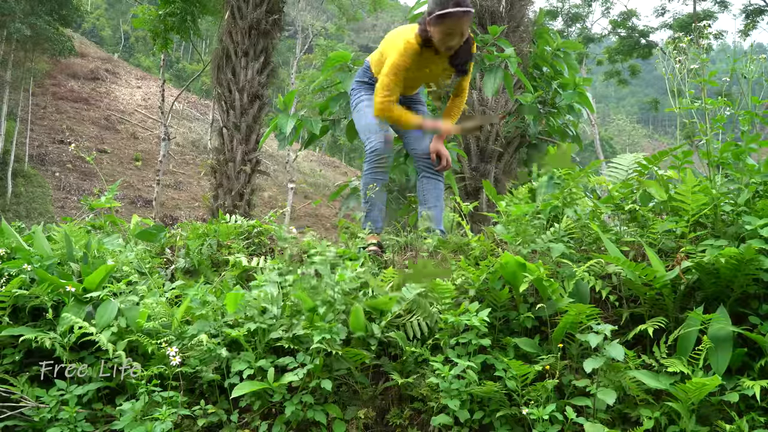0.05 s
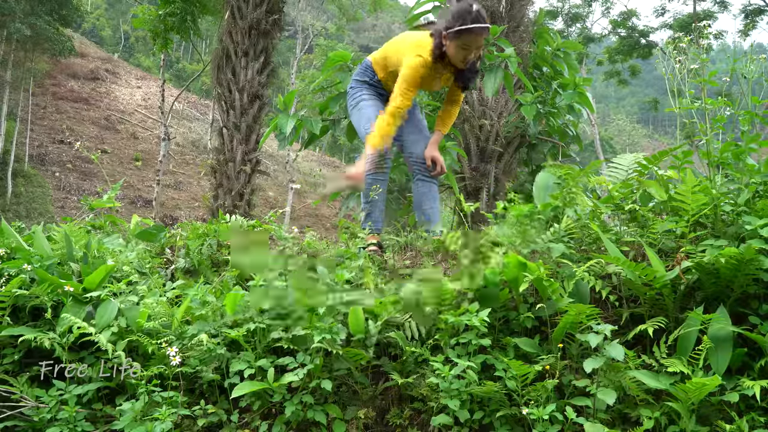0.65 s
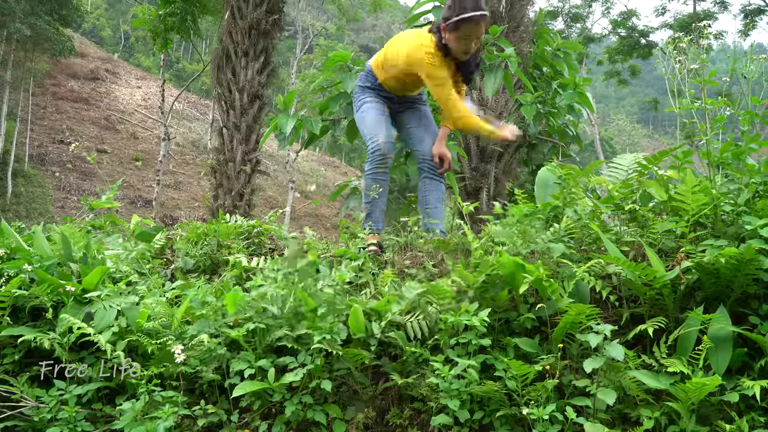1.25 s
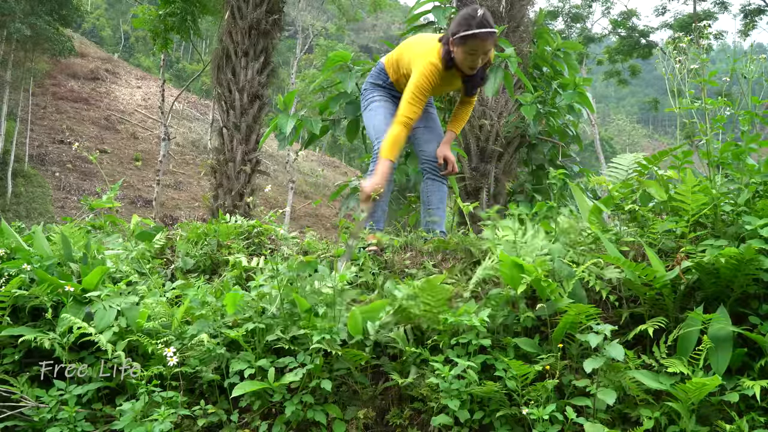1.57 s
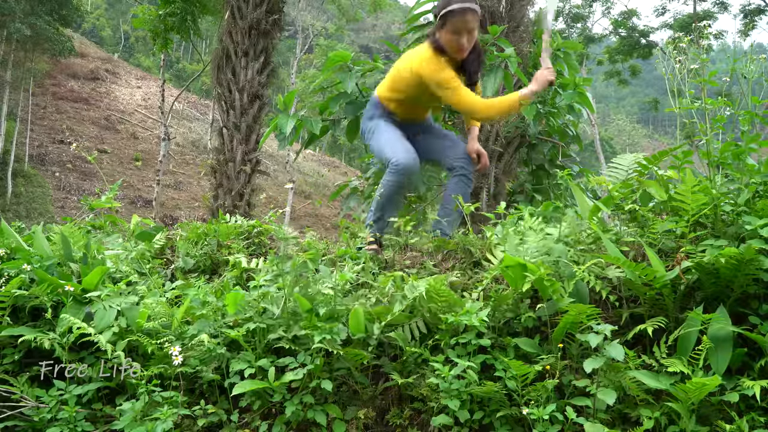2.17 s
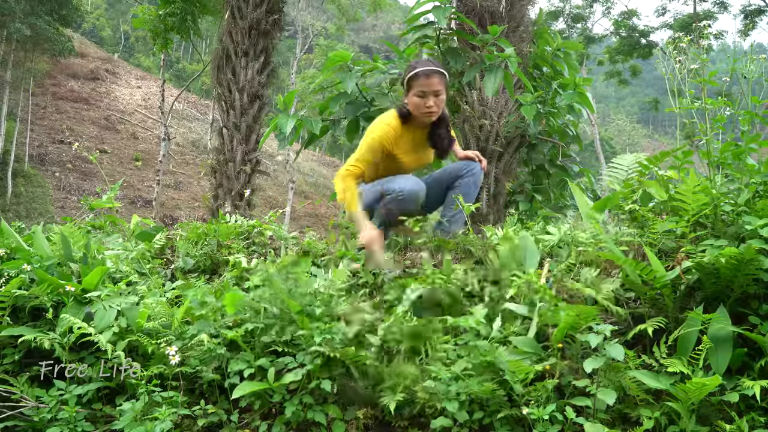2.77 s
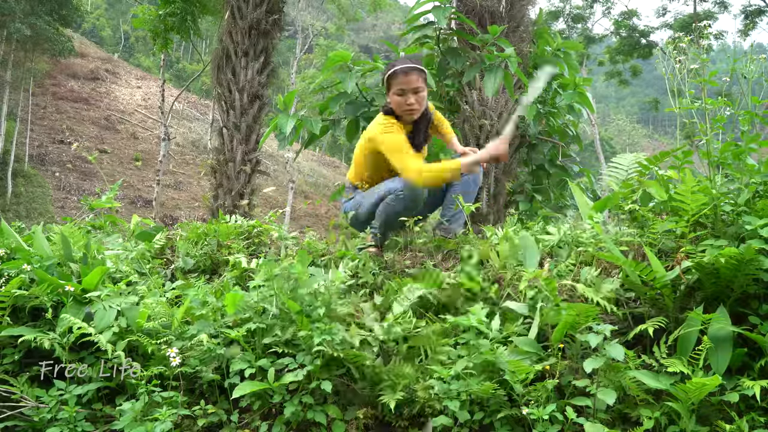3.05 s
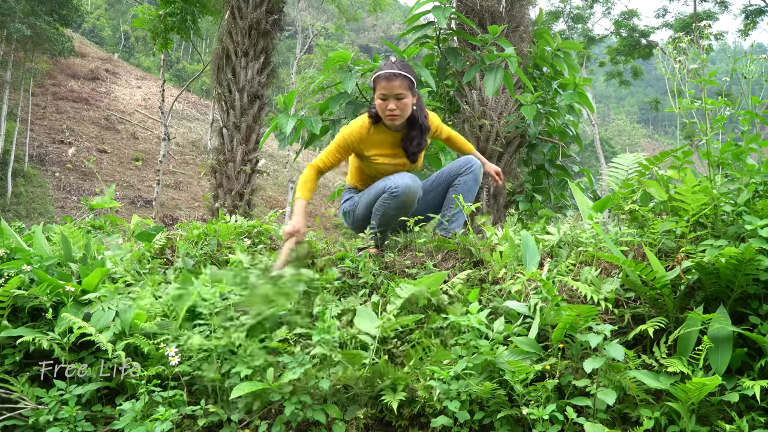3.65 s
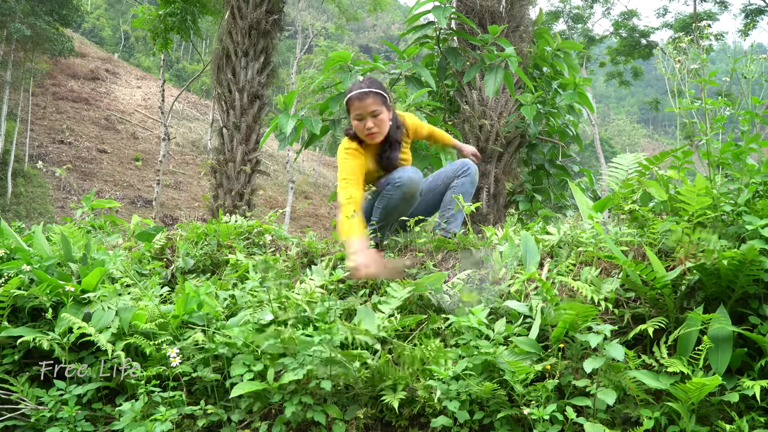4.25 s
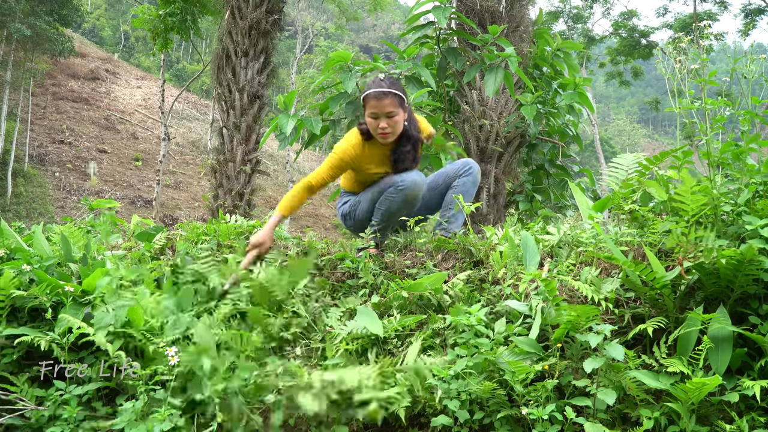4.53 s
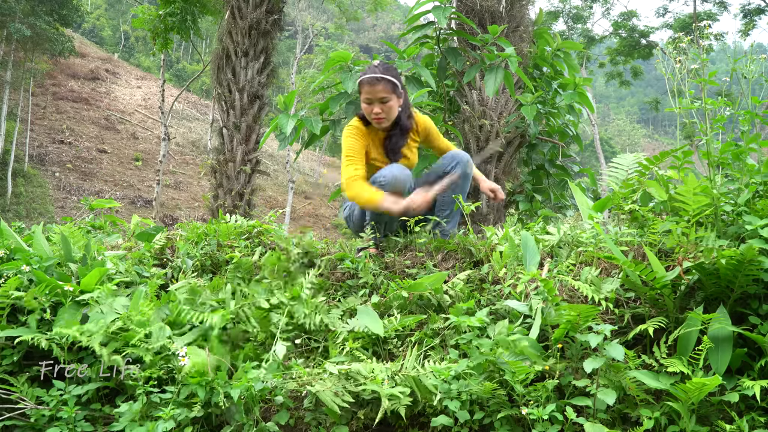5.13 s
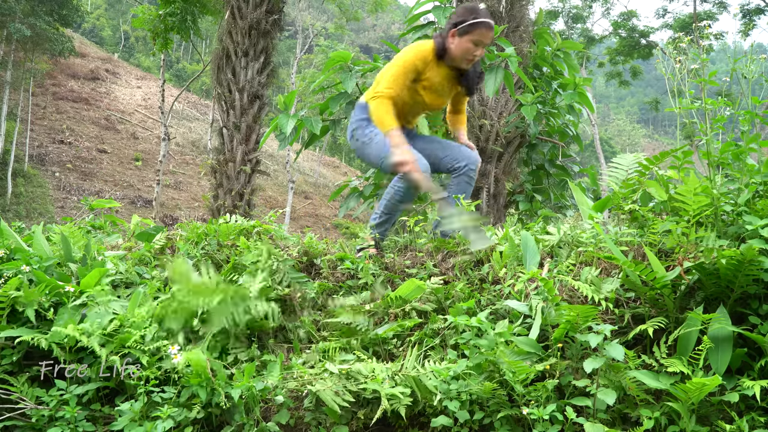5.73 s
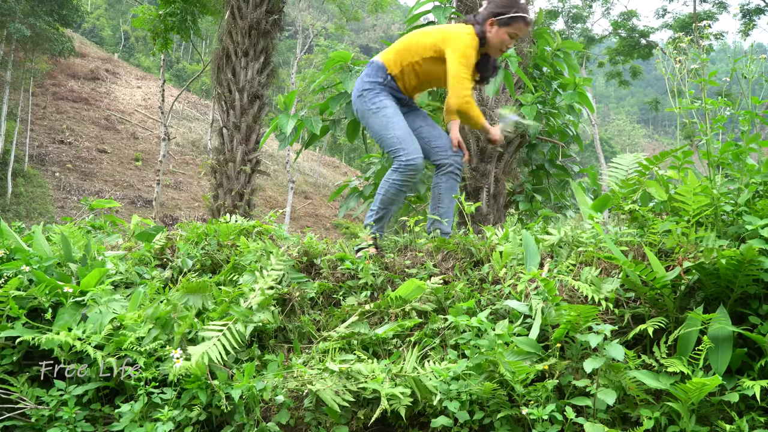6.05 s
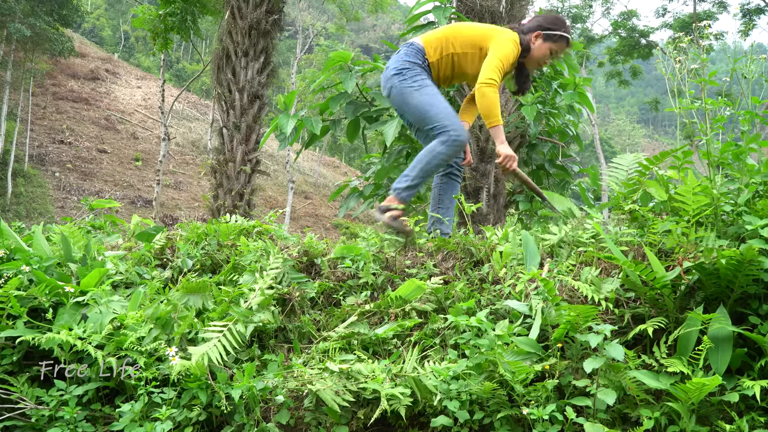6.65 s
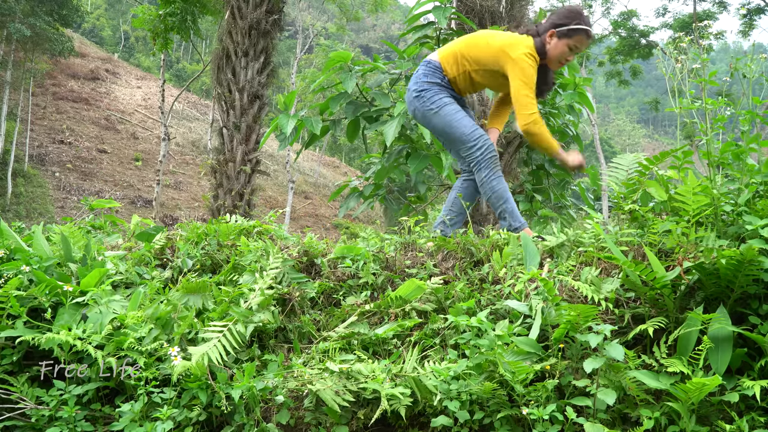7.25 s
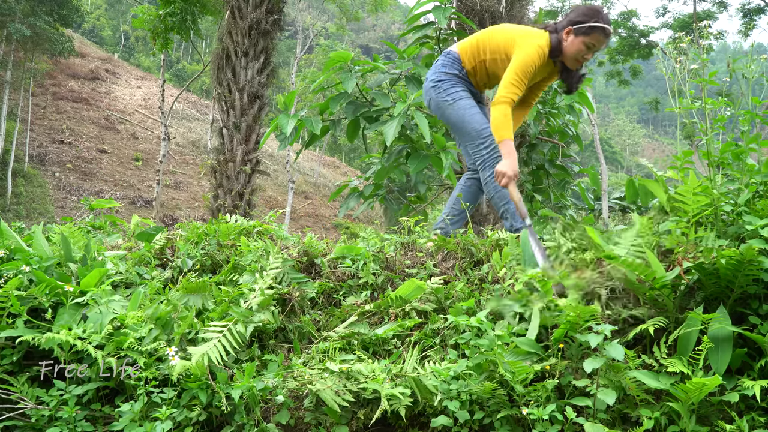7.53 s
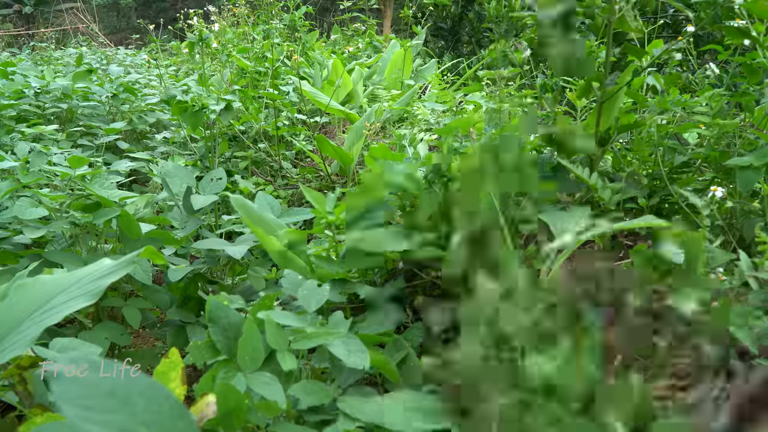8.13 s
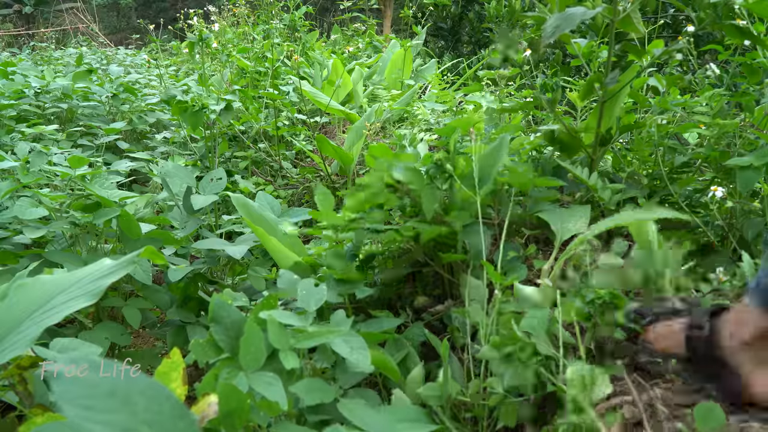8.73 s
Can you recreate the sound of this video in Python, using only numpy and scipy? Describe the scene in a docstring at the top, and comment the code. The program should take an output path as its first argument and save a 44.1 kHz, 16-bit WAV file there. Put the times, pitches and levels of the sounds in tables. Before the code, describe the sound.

Repeated swishing chops cut weeds and thud into soil, stems cracking and leaves pattering down, while insects chirr softly outdoors.

```python
"""A hillside garden, where a short-handled blade chops again and again through weeds into the soil. Each stroke
is a mass of tiny fractures: stems tear, the steel rings and the damped earth thuds. Thick stems snap, wood
knocks once and dry stalks creak by stick-slip friction; cut leaves and twigs patter down. Behind the work,
insects chirr, a cicada whistles once, and far birds whistle and hoot over a soft hush of air."""
import sys
import numpy as np
from scipy import signal
from scipy.fft import rfft, irfft, next_fast_len
from scipy.io import wavfile

SR = 44100
rng = np.random.default_rng(int(sys.argv[2]) if len(sys.argv) > 2 else 0)


def pcm_store(signal):
    """Save signal as 16-bit PCM."""
    levels = np.round(np.clip(np.atleast_2d(signal), -1, 1) * 32767)
    wavfile.write(sys.argv[1], SR, levels.astype(np.int16).T)


N = 387638
TIME = np.arange(N) / SR

# strokes of the blade: start_s, rise_s, in_weeds_s, level_db, t60_s, treble_db, bass_db, soil_db
CHOPS = [(0.552, 0.022, 0.047, -16, 0.28, 3, -2, -30.5), (0.634, .002, .02, -20, 0.31, -4.5, -6, -45),
         (1.476, .011, 0.099, -15.5, 0.37, 1, -2, -28), (2.507, 0.0063, 0.1, -11.5, 0.094, -2.5, -3.5, -24),
         (3.417, 0.01, 0.094, -11.5, 0.23, -6.5, -3.5, -32), (4.359, 0.015, 0.12, -12, 0.2, -5, -3, -33),
         (5.284, 0.018, 0.091, -12, 0.16, -2, -4.5, -31),
         (6.514, 0.0074, 0.018, -17, 0.036, -24, -0.5, -38), (7.409, 0.017, 0.056, -19, 0.51, 2, -2, -32),
         (8.139, .002, 0.052, -10.5, .26, -13, -7, -29)]
# blade or legs brushing through plants: start_s, swell_s, level_db, t60_s
BRUSHES = [(0.063, 0.011, -30, 0.23), (2.492, 0.015, -21, 0.053), (2.88, 0.031, -23, .13),
           (6.468, 0.059, -24.5, 0.23), (8.101, 0.013, -19.5, 0.21), (8.324, 0.078, -27, 0.12),
           (8.459, 0.0058, -26.5, 0.24), (8.657, 0.013, -30.5, 1.1)]
# spectrum of tearing stems: frequency_hz, level_db
TEAR_SPECTRUM = [(18, -48), (30, -12), (309, 1.5), (471, -2), (662, 3), (883, -4), (1570, -0.5), (1790, -3),
                 (2660, -2.5), (3740, -2), (7200, -9), (8870, -9), (10900, -15), (12500, -13),
                 (15800, -19.5)]
# damped modes of the steel: pitch_hz, level_db, t60_s
BLADE_MODES = [(322, -24.5, 0.058), (652, -33.5, 0.3), (950, -21.5, 0.014), (1170, -24, 0.017),
               (3840, -21.5, 0.0046)]
# blows on roots and firm clods: start_s, level_db, pitch_hz, t60_s
CLODS = [(0.635, -20, 686, 0.038), (2.517, -14.5, 335, 0.16), (2.924, -30, 251, .035),
         (3.428, -27, 257, 0.088), (4.384, -22.5, 184, 0.12), (6.520, -15, 556, 0.049),
         (7.428, -25.5, 270, .11), (8.204, -24, 400, 0.067)]
# thick stems and twigs breaking: start_s, level_db, pitch_hz, t60_s
SNAPS = [(0.030, -24.5, 1200, 0.013), (0.575, 1, 1810, 0.013), (0.635, -9, 1000, 0.032),
         (0.983, -19, 1020, 0.036), (1.013, -17.5, 3300, 0.011), (1.11, -25, 2200, 0.01),
         (1.139, -19.5, 1000, .024), (1.241, -20.5, 1490, 0.011), (1.455, -14, 3020, 0.24),
         (1.918, -24.5, 1540, .039), (2.489, -11, 2000, .07), (2.621, -6.5, 1820, 0.035),
         (2.918, -5, 2650, 0.019), (3.427, -3, 5000, 0.022), (3.453, 2, 1500, 0.044),
         (4.022, -22.5, 1380, 0.059), (4.335, -9, 1170, 0.02), (4.349, -9, 1470, .052),
         (4.3525, 2, 13000, 0.003), (5.287, -10.5, 1030, 0.024), (5.306, -7, 2500, 0.012),
         (5.911, -21.5, 2200, .07), (6.767, -19, 1100, 0.031), (6.816, -21, 2000, 0.024),
         (7.411, -15, 1500, .02), (8.095, -15.5, 3000, .008), (8.121, -2, 3000, 0.011),
         (8.161, 5.5, 4000, 0.018), (8.342, -10, 2430, .04), (8.492, -13.5, 2480, 0.027),
         (8.605, -19.5, 1190, 0.011), (8.666, -13, 1710, 0.014), (8.682, -9.5, 1600, 0.012),
         (8.758, -8.5, 7000, .012), (8.783, -13, 1470, .007)]
# damped modes of dry wood: pitch_hz, level_db, t60_s
WOOD_MODES = [(414, -12.5, 0.008), (920, -7.5, 0.0051), (2000, -16, 0.012), (2620, -11.5, 0.0049)]
# falls of loose leaves and twigs: peak_s, leaves_db, fade_db_per_s, twigs_db
FALLS = [(0.85, -36, 27, -25), (1.2, -43, 18, -23.5), (1.71, -43, 55, -29), (2.831, -34, 77, -27),
         (3.74, -31, 40, -24.5), (4.75, -34, 47, -33), (5.579, -40, 57, -34), (5.98, -40, 132, -37),
         (6.79, -37, 200, -31.5), (7.16, -45, 54, -29.5), (8.39, -35, 200, -26), (8.75, -31, 40, -18)]
# spectrum of rustling leaves: frequency_hz, level_db
LEAF_SPECTRUM = [(29, -54), (50, -22), (141, -12), (202, -14.5), (352, -3), (387, -9), (837, -7),
                 (1200, -5.5), (1680, -6.5), (4000, -6), (8650, -16.5), (15800, -25)]
# dry stalks rubbing: start_s, length_s, level_db
CREAKS = [(8.338, .04, -31.5), (8.564, 0.014, -39), (8.598, 0.01, -33), (8.637, .07, -29),
          (8.685, 0.066, -42)]
# bands of the crickets, the cicadas and one nearer insect's rasp: centre_hz, width_hz, level_db
CRICKET_BANDS = [(4810, 800, -50), (5700, 510, -58), (8470, 950, -55.5)]
CICADA_BANDS = [(2660, 380, -64), (3560, 1150, -58), (3900, 310, -63), (5200, 1200, -59),
                (6120, 350, -62.5), (7160, 700, -60.5), (7900, 380, -63.5), (9050, 2200, -55.5)]
RASP_BANDS = [(3600, 1700, -48.5), (5140, 1200, -51.5)]
# loudness of each insect chirr, with abrupt steps near 6 and 8 s: time_s, gain_db
CRICKET_GAINS = [(0, -2.5), (2.3, -4.5), (3.2, -1.5), (5.9, -1), (6.9, -3.5), (7.7, 0), (8.1, -6)]
CICADA_GAINS = [(0, 0.5), (0.5, -8), (2.3, -0.5), (3.2, -4), (4.2, -2.5), (5.9, -0.5), (6.05, 1.5),
                (7.4, 4.5), (7.65, 0)]
RASP_GAINS = [(7.5, -50), (7.65, 2), (7.8, 0), (7.98, 0.5), (8.01, -46)]
# whistled glides, of birds except the one at 7.163 s, a cicada's: start_s, length_s, start_hz, end_hz, level_db
WHISTLES = [(0.0, .063, 4870, 4830, -49.5), (0.126, 0.15, 4700, 4280, -54), (3.173, 0.052, 2200, 2090, -49),
            (3.206, .06, 2140, 2580, -47), (3.326, 0.098, 2850, 3140, -45.5),
            (7.163, 0.32, 5430, 4850, -56), (7.721, .22, 5150, 5200, -51.5),
            (7.915, 0.046, 2480, 1940, -50)]
# a far bird's hoots, all on one rising note: start_s, length_s, level_db
HOOTS = [(3.766, .11, -48), (4.065, 0.15, -48.5), (4.755, .11, -47), (5.085, 0.15, -50)]
# spectrum of the background hush: frequency_hz, level_db
HUSH_SPECTRUM = [(25, -2.5), (70, -1.5), (150, -3), (320, 2), (600, 0.5), (1200, -2), (2000, -3),
                 (3800, -5.5), (7000, -11.5), (10000, -24.5), (12000, -21), (16000, -23)]
# loudness of the background hush: time_s, level_db
HUSH_LEVELS = [(0, -49.5), (2.3, -52.5), (3.2, -50), (5.9, -49), (6.1, -55), (6.5, -53.5), (6.9, -49.5),
               (7.9, -50.5)]


def strokes(slowing_db=-2, stalk_rub_db=0.5):
    """Fracture excites resonance: tearing fibres ring the steel, and force falls as the blade slows."""
    fibres = crackle(per_s=7000, spread_db=3.5, cycles=9, tick_db=-1)
    fibres += from_db(-3) * rng.standard_normal(N)
    bunches = from_db(1.02 * drift(170))  # stems give way in bunches
    stems = coloured(fibres * bunches, TEAR_SPECTRUM)
    steel = sum(from_db(db) * unit_rms(ring(fibres, hz, t60)) for hz, db, t60 in BLADE_MODES)
    tear = unit_rms(stems + steel)
    bands = np.array([filtered(tear, 5400, "high", order=1),  # thin leaves
                      filtered(tear, [2800, 5000], "band", order=1),  # stiff stalks
                      filtered(tear, 910, "low", order=1)])  # roots and soil
    chops = [(s, rise, length, db, slowing_db, t60, [treble_db, 0, bass_db])
             for s, rise, length, db, t60, treble_db, bass_db, _ in CHOPS]
    brushes = [(s, swell, swell, db, 0, t60, [0, stalk_rub_db, 0]) for s, swell, db, t60 in BRUSHES]
    out, t = np.zeros(N), TIME[:SR]
    for s, rise, length, db, drop_db, t60, tone_db in chops + brushes:
        force = np.minimum(t / rise, 1) * from_db(db + drop_db * np.minimum(t / length, 1))
        force *= decay(np.maximum(t - length, 0), t60)
        part = slice(round(s * SR), round(s * SR) + SR)
        sound = tear[part] + (from_db(tone_db) - 1) @ bands[:, part]
        add(out, s, sound * force[:len(sound)])
    return out


def thuds(soil_delay_s=0.01448, soil_hz=103, soil_t60_s=0.13):
    """Heavy damping: struck earth gives a brief band of low noise; roots and clods sound higher."""
    out, t = np.zeros(N), TIME[:SR // 4]
    soil = [(s + soil_delay_s, soil_db, soil_hz, soil_t60_s) for s, *_, soil_db in CHOPS]
    for s, db, hz, t60 in soil + CLODS:
        earth = unit_rms(filtered(rng.standard_normal(len(t)), [hz * 0.7, hz * 2.04], "band"))
        add(out, s, from_db(db + 2) * earth * decay(t, t60))
    return out


def snaps(splinter_db=-3, click_db=-1.5, gain_db=-1.5):
    """Brittle fracture: one impulse and a run of splinters, coloured by the stem's thickness."""
    out, t = np.zeros(N), TIME[:SR // 10]
    for s, db, hz, t60 in SNAPS + twigs():
        splinters = rng.standard_normal(len(t)) * (rng.random(len(t)) < .15)
        burst = from_db(splinter_db) * splinters * decay(t, t60)
        burst[0] += 1  # the stem parts
        body = filtered(burst, [hz * .5, hz * 1.64], "band", order=1)
        crack = filtered(body + from_db(click_db) * burst, hz * 2.45, "low")
        crack = filtered(crack, 220, "high")
        add(out, s, from_db(db + gain_db) * crack / np.abs(crack).max())
    return out


def twigs(per_fall=10, lead_s=.08, span_s=.41, spread_db=6, fade_db_per_s=3, low_hz=1000, high_hz=3180):
    """Random impacts: each fall scatters rows of small snaps, the thinner twigs higher in pitch."""
    rows, t60 = [], 0.013
    for s, _, _, db in FALLS:
        for when, size, thinness in rng.random((per_fall, 3)):
            late_s = span_s * when - lead_s
            level_db = db - fade_db_per_s * abs(late_s) + spread_db * (size - .5)
            rows.append((s + late_s, level_db, low_hz * (high_hz / low_hz) ** thinness, t60))
    return rows


def knock(start_s=3.036, contact_hz=4000):
    """Modal vibration: one firm contact rings the wood for a few cycles."""
    out, t = np.zeros(N), TIME[:SR // 10]
    modes = sum((-1) ** k * from_db(db) * decay(t, t60) * np.sin(2 * np.pi * hz * t)
                for k, (hz, db, t60) in enumerate(WOOD_MODES))
    add(out, start_s, filtered(modes, contact_hz, "low"))
    return out


def leaves(crumbs_per_s=110):
    """Superposition: countless light impacts of leaves merge into a rustle, with ticks of soil."""
    patter = crackle(per_s=2200, spread_db=2.5, cycles=7, tick_db=-5.5)
    patter += from_db(4.5) * rng.standard_normal(N)
    crumbs = unit_rms(rng.standard_normal(N) * (rng.random(N) < crumbs_per_s / SR))
    patter += from_db(-5.5) * crumbs
    flutter = from_db(0.57 * drift(50))
    return from_db(-3.5) * leaf_motion() * coloured(patter * flutter, LEAF_SPECTRUM)


def leaf_motion(sway_db=-15, sway_fade_db_per_s=44.5, full_sweep_s=0.097, build_s=.5, round_db=1.7):
    """Incoherent sources add in power: swaying plants and falling leaves share one envelope."""
    power, t = np.zeros(N), TIME[:2 * SR]
    for s, _, length, db, *_ in CHOPS:
        stirred = length / full_sweep_s  # a shorter sweep stirs fewer plants
        sway = stirred * from_db(db + sway_db - sway_fade_db_per_s * t)
        add(power, s + length, sway ** 2)
    for s, db, fade_db_per_s, _ in FALLS:
        loss_db = fade_db_per_s * (t - build_s)
        loss_db = np.where(loss_db < 0, (loss_db / round_db) ** 2, loss_db)  # rounded rise to the peak
        add(power, s - build_s, from_db(db - np.minimum(loss_db, 100)) ** 2)
    return np.sqrt(power)


def creaks(slips_per_s=880, stalk_hz=1390, t60_s=0.0086):
    """Stick-slip friction: uneven slips excite the resonance of a hollow stalk."""
    out, t = np.zeros(N), TIME[:SR // 4]
    for s, length, db in CREAKS:
        slips = rng.standard_normal(len(t)) * (rng.random(len(t)) < slips_per_s / SR)
        rub = np.sin(np.pi * np.minimum(t / length, 1))
        add(out, s, from_db(db) * rub * unit_rms(ring(slips, stalk_hz, t60_s)))
    return out


def insects(bands, gains, flutter_db):
    """Narrow-band noise: insect pulses of unrelated phase blur into a fluttering chirr."""
    out = np.zeros(N)
    for hz, width, db in bands:
        buzz = filtered(rng.standard_normal(N), [hz - width / 2, hz + width / 2], "band")
        out += from_db(db + flutter_db * drift(140)) * unit_rms(buzz)
    return gain_curve(gains) * out


def far_calls(whistle_waver_hz=36, hoot_glide_hz=(339, 357), hoot_waver_hz=2.5, echo_db=-2, echo_t60_s=.37):
    """Frequency modulation and scattering: notes glide and quaver; foliage echoes the high ones."""
    calls, quaver = np.zeros(N), drift(260)
    whistles = [(*note, whistle_waver_hz) for note in WHISTLES]
    hoots = [(s, length, *hoot_glide_hz, db, hoot_waver_hz) for s, length, db in HOOTS]
    for s, length, start_hz, end_hz, db, waver_hz in whistles + hoots:
        progress = np.linspace(0, 1, int(length * SR))
        glide_hz = np.interp(progress, [0, 1], [start_hz, end_hz])
        hz = glide_hz + waver_hz * quaver[int(s * SR):][:len(progress)]
        swell = np.sqrt(2 * np.abs(np.sin(np.pi * progress)))
        add(calls, s, from_db(db) * swell * np.sin(2 * np.pi * np.cumsum(hz) / SR))
    foliage = rng.standard_normal(SR // 2) * decay(TIME[:SR // 2], echo_t60_s)
    foliage = filtered(foliage, 1200, "high")
    echo = signal.fftconvolve(calls, foliage / np.linalg.norm(foliage))[:N]
    return calls + from_db(echo_db) * echo


def background_hush():
    """Broadband ambient noise: its level wavers slightly and drops abruptly near 6 s."""
    return gain_curve(HUSH_LEVELS) * coloured(rng.standard_normal(N), HUSH_SPECTRUM)


def crackle(per_s, spread_db, cycles, tick_db):
    """A Poisson process: fibres break at random, each with a tick and a brief ring; nearly white."""
    at = np.flatnonzero(rng.random(N) < per_s / SR)
    size, sign, tick_sign, pitch = rng.random((4, N))[:, at]
    sizes = from_db(spread_db * np.minimum(-np.log(1 - size), 4))
    pitches_hz = np.geomspace(300, 15000, 16)
    weights = np.sqrt(pitches_hz)  # thin fibres are more common
    pitch_index = np.searchsorted(np.cumsum(weights) / weights.sum(), pitch)
    rings = np.zeros(N)
    for k, hz in enumerate(pitches_hz):
        clicks = np.bincount(at, sizes * np.sign(sign - .5) * (pitch_index == k), N)
        rings += weights[k] * unit_rms(ring(clicks, hz, cycles / hz))
    ticks = np.bincount(at, sizes * np.sign(tick_sign - .5), N)
    return unit_rms(unit_rms(rings) + from_db(tick_db) * unit_rms(ticks))


def ring(x, hz, t60):
    """A damped harmonic oscillator driven by x."""
    radius, angle = decay(1 / SR, t60), 2 * np.pi * hz / SR
    return signal.lfilter([1, 0, -1], [1, -2 * radius * np.cos(angle), radius ** 2], x + 1e-18)


def coloured(x, spectrum):
    """Spectral shaping of a steady texture, at unit power."""
    hz, db = np.transpose(spectrum)
    size = next_fast_len(N)
    bins_hz = np.maximum(np.arange(size // 2 + 1) * SR / size, 1)
    gains = from_db(np.interp(np.log(bins_hz), np.log(hz), db))
    return unit_rms(irfft(rfft(x, size) * gains, size)[:N])


def filtered(x, hz, kind, order=2):
    """Filtering with a maximally flat passband."""
    return signal.sosfilt(signal.butter(order, np.clip(hz, 10, .45 * SR), kind, fs=SR, output="sos"), x)


def drift(knots_per_s):
    """Random modulation of unit power."""
    knots = rng.standard_normal(2 * N // 40)
    return unit_rms(np.interp(TIME * knots_per_s, np.arange(len(knots)), knots))


def gain_curve(rows):
    """Interpolation of time_s, level_db rows into a gain for every sample."""
    return from_db(np.interp(TIME, *np.transpose(rows)))


def decay(t, t60):
    """Exponential decay: 60 dB in t60 seconds."""
    return from_db(-60 * t / t60)


def from_db(db):
    """Amplitude ratio of a level in decibels."""
    return 10 ** (np.asarray(db) / 20)


def unit_rms(x):
    """Normalisation to unit power."""
    return x / np.sqrt(np.mean(x ** 2) + 1e-20)


def add(out, start_s, sound):
    """Superposition of a short sound on a longer one."""
    at = max(0, round(start_s * SR))
    out[at:at + len(sound)] += sound[:max(0, N - at)]


def scene():
    """Pressures add linearly: the work in front and the hillside behind, in one channel."""
    work = strokes() + thuds() + snaps() + knock()
    undergrowth = leaves() + creaks()
    hush = background_hush()
    crickets = insects(CRICKET_BANDS, CRICKET_GAINS, flutter_db=2)
    cicadas = insects(CICADA_BANDS, CICADA_GAINS, flutter_db=1)
    rasp = insects(RASP_BANDS, RASP_GAINS, flutter_db=1.3)
    return (work + undergrowth + crickets + cicadas + rasp + far_calls() + hush)[None]


def record(dry):
    """Band limiting and soft saturation: the top is cut and the highest peaks are rounded."""
    cutoff_hz = 16000
    lowpass = signal.ellip(10, .1, 80, cutoff_hz, fs=SR, output="sos")
    limited = signal.sosfilt(lowpass, dry)
    rounded = limited / (1 + (limited ** 2 / .8) ** 3) ** (1 / 6)
    return signal.sosfilt(lowpass, rounded)


dry = scene()
out = record(dry)
pcm_store(out)
```